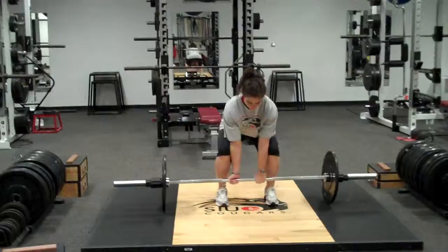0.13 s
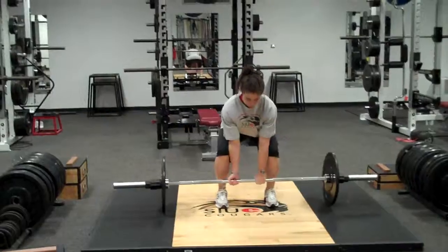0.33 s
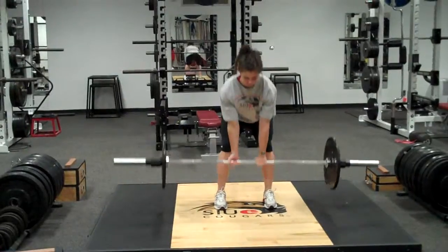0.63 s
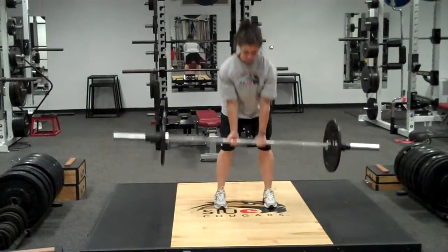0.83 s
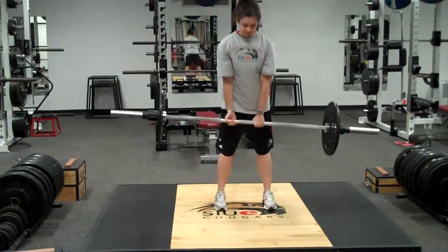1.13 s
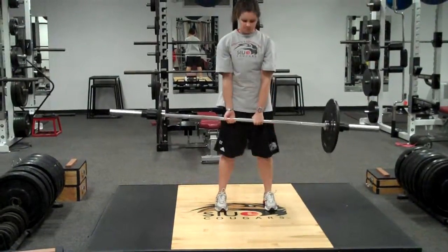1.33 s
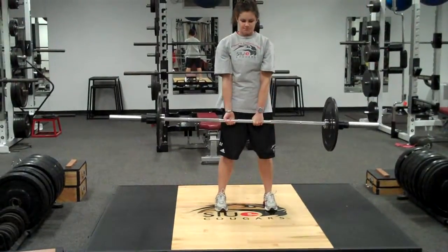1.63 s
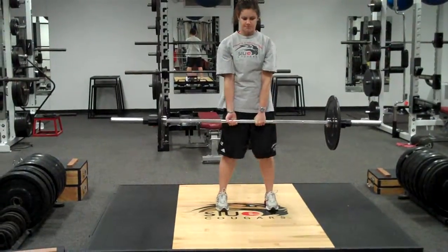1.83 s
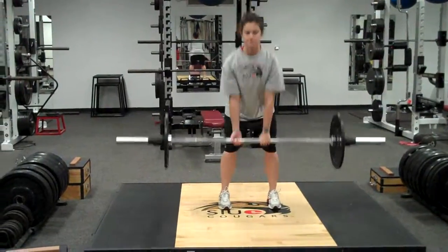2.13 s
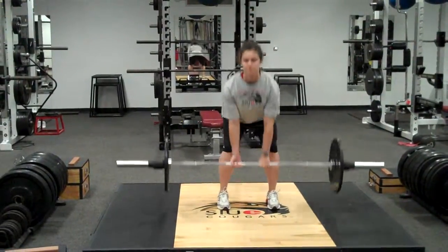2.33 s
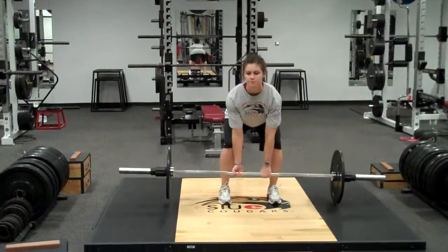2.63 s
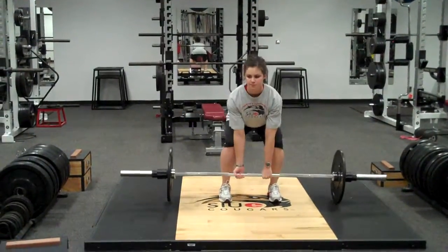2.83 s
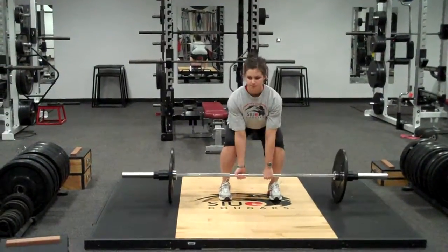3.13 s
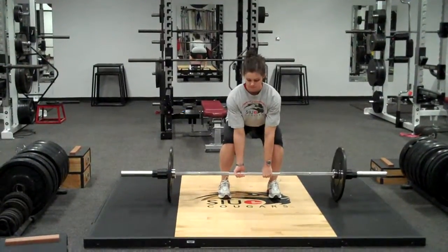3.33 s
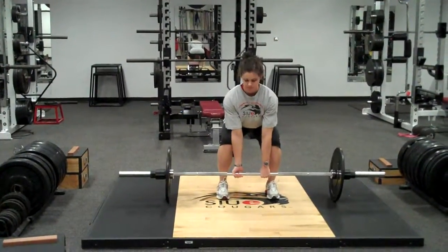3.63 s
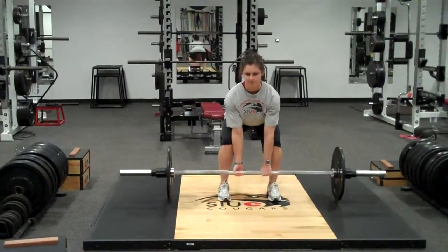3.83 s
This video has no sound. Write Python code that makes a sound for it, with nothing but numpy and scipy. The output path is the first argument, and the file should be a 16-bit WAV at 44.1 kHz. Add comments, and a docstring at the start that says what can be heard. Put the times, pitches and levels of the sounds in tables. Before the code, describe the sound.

Loose weight plates clank on a steel bar over a gym's low ventilation hum. Soft rolling, a light clink and a tick come first, then bright, ringing clanks and thuds as the barbell is set down, and a last clink.

```python
"""A deadlift in a gym

A barbell rolls, is lifted from a wooden platform and is set down, one end after the other.
Loose plates strike the steel sleeves; each impact excites the modes of sleeve and bar and shakes the
boards. The grip ticks, and hard surfaces echo every blow over the steady hum of the ventilation."""
import sys
import numpy as np
from scipy import signal
from scipy.fft import rfft, irfft
from scipy.io import wavfile
from scipy.ndimage import uniform_filter1d

SR = 44100
rng = np.random.default_rng(int(sys.argv[2]) if len(sys.argv) > 2 else 0)


def generate_wav(sig):
    """Save sig (samples, or channels by samples) to the path in sys.argv[1] as 16-bit PCM at SR."""
    pcm = np.round(np.clip(np.atleast_2d(sig).T, -1, 1) * 32767).astype(np.int16)
    wavfile.write(sys.argv[1], SR, pcm)


N = 176400
BLOW_SIZE = 8192  # samples

def undb(db):
    """Amplitude ratio of a level in decibels."""
    return 10 ** (np.asarray(db) / 20)

def freqs(size=N):
    """Frequency of each spectral bin, at least 1 Hz."""
    return np.maximum(np.arange(size // 2 + 1) * SR / size, 1)

def curve(points, hz):
    """Interpolation of (Hz, value) points on a logarithmic frequency axis."""
    f, values = np.array(points, float).T
    return np.interp(np.log(hz), np.log(np.sort(f)), values)

def resonator(db):
    """Minimum-phase impulse response with the given gain per bin."""
    cepstrum = irfft(np.log(undb(db)))
    cepstrum[1:BLOW_SIZE // 2] *= 2
    cepstrum[BLOW_SIZE // 2 + 1:] = 0
    return irfft(np.exp(rfft(cepstrum)))

def convolve(drive, response):
    """A linear system convolves its drive with its impulse response."""
    return signal.fftconvolve(np.atleast_2d(drive), np.atleast_2d(response), axes=-1)

def add(out, start_s, sound):
    """Superposition of a sound from a given time on."""
    i = int(start_s * SR)
    out[:, i:i + sound.shape[-1]] += sound[..., :N - i]

def walk(rate_hz):
    """Smooth random drift of unit standard deviation."""
    k = int(SR / rate_hz)
    steps = np.repeat(rng.standard_normal(N // k + 1), k)
    drift = uniform_filter1d(uniform_filter1d(steps, k), k)[:N]
    return drift / drift.std()

def diffuse(db):
    """A diffuse noise field of unit rms: the channels are more coherent in the bass than in the treble."""
    # Stereo width. Each row: frequency in Hz, side over mid in dB.
    side_level = [(30, -3), (70, -5), (130, -17.5), (300, -22), (600, -16.5), (1200, -10), (2500, -2),
                  (8000, 1.5)]
    mid, side = rfft(rng.standard_normal((2, N)))
    width = undb(curve(side_level, freqs()))
    spectra = np.array([mid + width * side, mid - width * side])
    field = irfft(spectra * undb(db) / np.hypot(1, width), N)
    return field / field.std()

def ventilation():
    """Turbulent air gives broadband noise; the fan's rotation adds wavering tones."""
    # Airflow spectrum. Each row: frequency in Hz, relative level in dB.
    air_spectrum = [(25, -13.5), (48, -21), (76, -14), (96, -17.5), (122, -4.5), (208, -4.5), (340, -9),
                    (472, -8.5), (722, -17.5), (1050, -19.5), (1680, -27), (3000, -33.5), (5500, -40),
                    (7300, -37.5), (9500, -48.5), (14000, -49)]
    # Fan tones. Each row: frequency in Hz, rms level in dB.
    fan_tones = [(75.4, -69.5), (208.5, -55), (339, -65.5)]
    air = diffuse(curve(air_spectrum, freqs())) * undb(-47.5 + 0.13 * walk(12))
    hum, wander_hz = 0, 2.02
    for hz, db in fan_tones:
        amplitude = np.sqrt(2) * undb(db + 1.2 * walk(4.55))
        hum += amplitude * np.sin(2 * np.pi * np.cumsum(hz + wander_hz * walk(12)) / SR)
    return air + hum

def rolling():
    """Rolling and friction of the plates on the platform make noise that fades as they leave it."""
    # Rolling spectrum. Each row: frequency in Hz, relative level in dB.
    spectrum = [(70, -7), (110, -3), (220, 0.5), (340, -1), (650, -6.5), (1100, -2), (1270, -12),
                (1390, -0.5), (1600, -12.5), (1950, -3), (2600, -13.5), (5000, -25.5), (6700, -21),
                (9000, -35.5), (12000, -41)]
    t = np.arange(N) / SR
    lift_s, decay_s = .5, .14
    fade = np.exp(-np.maximum(t - lift_s, 0) / decay_s)
    return diffuse(curve(spectrum, freqs())) * undb(-47.5 + 0.6 * walk(32.3)) * fade

def ring(modes):
    """Free vibration of struck steel: a sum of exponentially damped modes."""
    t = np.arange(SR) / SR
    return sum(undb(db) * np.sin(2 * np.pi * (hz * t + rng.random())) * np.exp(-np.log(1000) * t / t60)
               for hz, db, t60 in modes)

def contact():
    """Dispersion of bending waves brings a blow's treble ahead of its bass; a fine rattle follows."""
    t = np.arange(BLOW_SIZE) / SR
    spread_s, spread_hz = .0025, 5900
    group_delay = spread_s * np.exp(-freqs(BLOW_SIZE) / spread_hz)
    blow = irfft(np.exp(-2j * np.pi * np.cumsum(group_delay) * SR / BLOW_SIZE))
    contact_s, chatter_s = .0023, .014
    fade = np.exp(-t / contact_s) + 0.54 * np.exp(-t / chatter_s)
    return blow + undb(-22.5) * rng.standard_normal(len(t)) * fade

def shudder():
    """Damped random vibration of the platform's boards, with unit energy."""
    t = np.arange(SR // 5) / SR
    rise_s, decay_s = .0029, .02
    burst = rng.standard_normal(len(t)) * (1 - np.exp(-t / rise_s)) * np.exp(-t / decay_s)
    return burst / np.linalg.norm(burst)

def clanks():
    """Impacts excite the resonances of sleeve, plate, bar and platform; gives (start, sound) pairs."""
    # Plate against sleeve. Each row: start in seconds, gain in dB, centre of the steel's peak in Hz,
    # then gains in dB of that peak, its overtone, the knock, and platform and bar together.
    impacts = [(0.381, -26, 7280, 10, 16.5, 6, -20), (0.4076, -27, 7410, 15, 18, 8, -6),
               (2.8378, -3, 7930, 9.5, -10, 1, -7), (2.893, -13.5, 6550, 2.5, -2, -2, 1),
               (3.0276, -7.5, 7530, 10, 4, 6, 6.5), (3.0460, -12.5, 6600, 6.5, 14, 0, 7),
               (3.083, -18, 7400, 4, 5, 3, 10.5), (3.1318, -15, 7700, 8, 7, 2, 6.5),
               (3.157, -16, 7370, 8, -2, 2.5, 3.5), (3.8128, -24, 6610, 7, 18, -1, -27),
               (3.8225, -19, 6770, 10, 2, -1, -9.5)]
    # Responses of steel, plate and platform. Each row: frequency in Hz, relative gain in dB.
    steel_spectrum = [(2000, -47.5), (5500, -23), (6200, -2.5), (6750, -2), (7300, 1.5), (8050, 0),
                      (8650, -15), (9650, -25.5), (10300, -17), (11500, -22), (12600, -38), (13400, -30),
                      (14050, -25), (14500, -43.5)]
    knock_spectrum = [(200, -26.5), (1000, -8.5), (2400, -12), (3000, -5.5), (3550, -1.5), (4000, 1.5),
                      (4600, 0), (5500, -5.5), (7000, -13), (12000, -31)]
    thud_spectrum = [(40, -28), (95, -12), (165, 5), (240, 1), (350, -5), (550, 1), (850, 2), (1250, -1),
                     (1650, 0.5), (2200, -6), (2950, 2), (3600, -10), (5000, -12), (8000, -30)]
    # Natural modes. Each row: frequency in Hz, relative level in dB, time to fall 60 dB in seconds.
    sleeve_modes = [(6202, -1, .45), (6060, -1, 0.33), (6420, -2, 0.34), (6750, -3, .6), (7350, -4, .55),
                    (7514, 2, .55), (8100, -5, .5), (8030, 9, .35), (10260, -15, .55), (13990, -23, .8)]
    bar_modes = [(770, -3, 1.1), (1214, -1, .9), (1593, -6, 1.0), (1852, -2, .65), (2140, -3, .7),
                 (2540, -2.5, .9), (3020, 1, .8), (3150, -3, .8), (3720, -10, .7)]
    peak_width_hz, overtone_ratio, overtone_width_hz = 420, 1.53, 520
    blows, f = [], freqs(BLOW_SIZE)
    knock = resonator(curve(knock_spectrum, f) + 3)
    thud = resonator(curve(thud_spectrum, f) + 3)
    for start_s, db, hz, peak_db, overtone_db, knock_db, thud_db in impacts:
        peak = peak_db * np.exp(-((f - hz) / peak_width_hz) ** 2)
        overtone = overtone_db * np.exp(-((f - overtone_ratio * hz) / overtone_width_hz) ** 2)
        steel = resonator(curve(steel_spectrum, f) + 16.5 + peak + overtone)
        sound = np.atleast_2d(undb(-41) * ring(sleeve_modes) + undb(thud_db - 56) * ring(bar_modes))
        add(sound, 0, convolve(contact(), steel + undb(knock_db) * knock))
        add(sound, 0, undb(thud_db) * convolve(shudder(), thud))
        blows.append((start_s, undb(db) * sound))
    return blows

def grip_ticks():
    """Light contacts of the grip give brief broadband transients; gives (start, sound) pairs."""
    # Ticks. Each row: start in seconds, gain in dB.
    ticks = [(1.1422, -26.5), (1.6442, -43)]
    # Response to a tick. Each row: frequency in Hz, relative gain in dB.
    spectrum = [(300, -23), (2000, -6), (3700, -1), (5500, -3), (8000, 0), (14000, -20)]
    response = resonator(curve(spectrum, freqs(BLOW_SIZE)))
    return [(start_s, undb(db) * convolve(contact(), response)) for start_s, db in ticks]

def gym(blows):
    """Direct sound, early reflections and diffuse reverberation; each blow has its own random tail."""
    # Reflections from floor and racks. Each row: delay in seconds, left gain in dB, right gain in dB.
    echoes = [(.0058, 2, 0), (0.0117, -6, -9), (0.021, -13, -7.5)]
    # Reverberation time. Each row: frequency in Hz, time to fall 60 dB in seconds.
    room_t60 = [(120, 1.4), (500, 1.5), (1500, 1.25), (4000, 0.82), (7500, .75), (12000, 0.53)]
    # Reverberation spectrum. Each row: frequency in Hz, gain in dB.
    room_level = [(150, 14), (1000, 7.95), (4000, 7.1), (7500, 4.4), (12000, 2.5)]
    out, t, f = np.zeros((2, N)), np.arange(SR) / SR, freqs()
    noise = rfft(diffuse(0 * f)) * undb(curve(room_level, f))
    centres_hz, build_s = np.geomspace(100, 14000, 9), .008
    bands = [irfft(noise * np.interp(np.log(f), np.log(centres_hz), share), N)
             for share in np.eye(len(centres_hz))]
    rates = np.log(1000) / curve(room_t60, centres_hz)[:, None]
    fades = np.exp(-rates * t) * np.sqrt(2 * rates / SR) * (1 - np.exp(-t / build_s))
    for start_s, sound in blows:
        i = rng.integers(N - SR)
        paths = sum(band[:, i:i + SR] * fade for band, fade in zip(bands, fades))
        paths[:, 0] += 1  # direct sound
        for delay_s, left_db, right_db in echoes:
            add(paths, delay_s, undb([[left_db], [right_db]]))
        add(out, start_s, convolve(sound, paths))
    return out

def whine():
    """Narrow-band noise, heard as a faint, flickering hiss while the bar comes down."""
    t = np.arange(N) / SR
    start_s, end_s, centre_hz, half_width_hz = 2.16, 3.5, 6540, 200
    gate = uniform_filter1d(1. * ((t > start_s) & (t < end_s)), SR // 20)
    band_db = -20 * np.log10(1 + ((freqs() - centre_hz) / half_width_hz) ** 2)
    return undb(-71 + 2.5 * walk(22)) * gate * diffuse(band_db)

def shade_right(x):
    """Attenuation that depends on frequency weakens the treble on the right."""
    # Right-side response. Each row: frequency in Hz, gain in dB.
    shade = [(6500, 0), (7300, -11.5), (8000, -15.5), (9500, -22), (10300, -11), (11500, -16.5),
             (14000, -20.5)]
    return np.array([x[0], irfft(rfft(x[1]) * undb(curve(shade, freqs())), N)])

def delay_left(x, lag_s=.00006):
    """Propagation delay: the sound reaches the left side slightly later."""
    return np.array([irfft(rfft(x[0]) * np.exp(-2j * np.pi * freqs() * lag_s), N), x[1]])

def scene():
    """Superposition of the reverberant blows, the rolling, the ventilation and the hiss."""
    barbell = shade_right(gym(clanks() + grip_ticks()))
    return barbell + delay_left(rolling() + ventilation()) + whine()

def record(dry):
    """After a brief silence, the sound is clipped at full scale and low-pass filtered."""
    start_s, cutoff_hz = .085, 14350
    live = np.arange(N) / SR > start_s
    lowpass = signal.ellip(12, .2, 80, cutoff_hz, fs=SR, output="sos")
    return signal.sosfilt(lowpass, np.clip(dry * live, -1, 1))

dry = scene()
out = record(dry)
generate_wav(out)
```